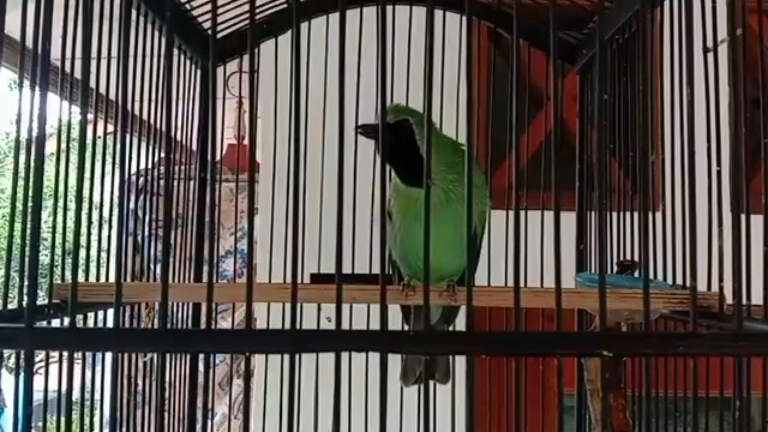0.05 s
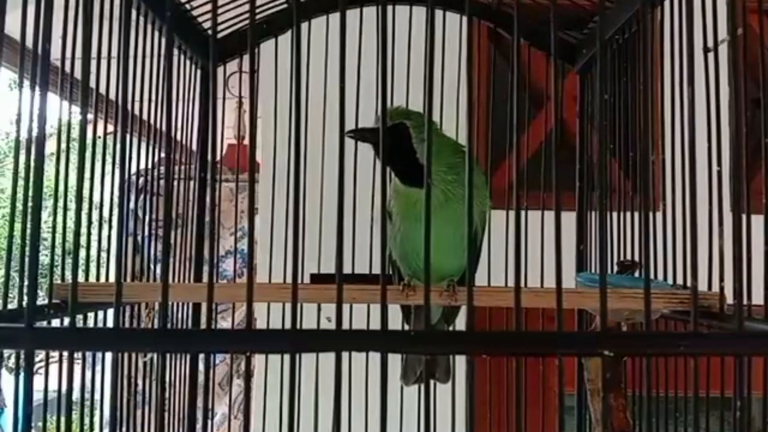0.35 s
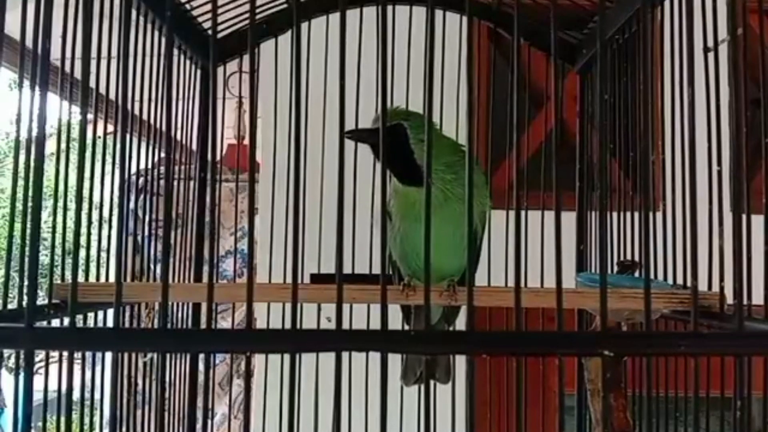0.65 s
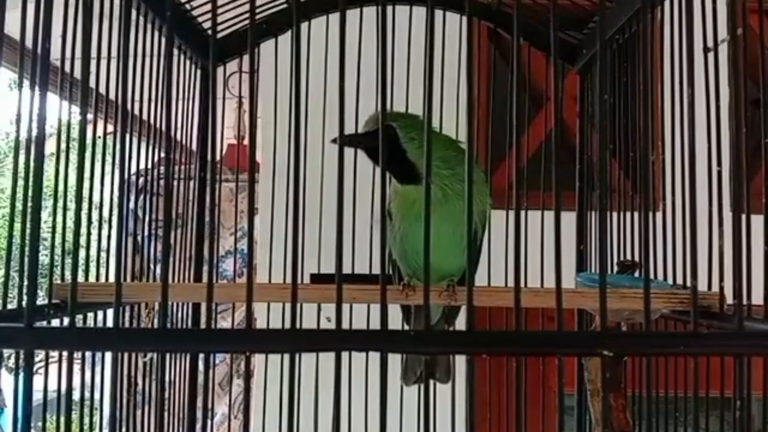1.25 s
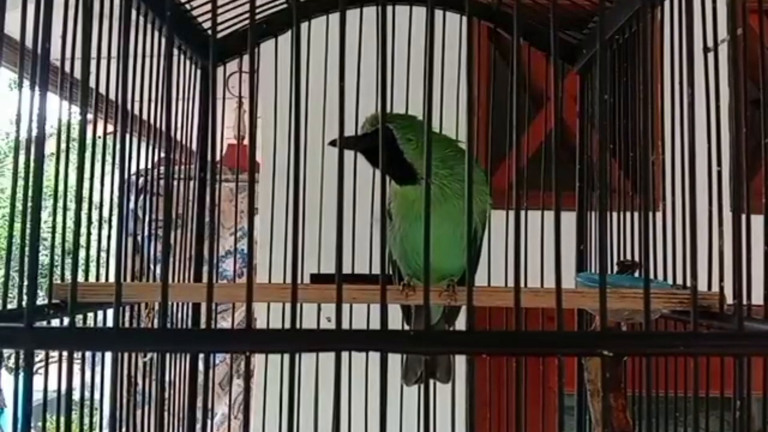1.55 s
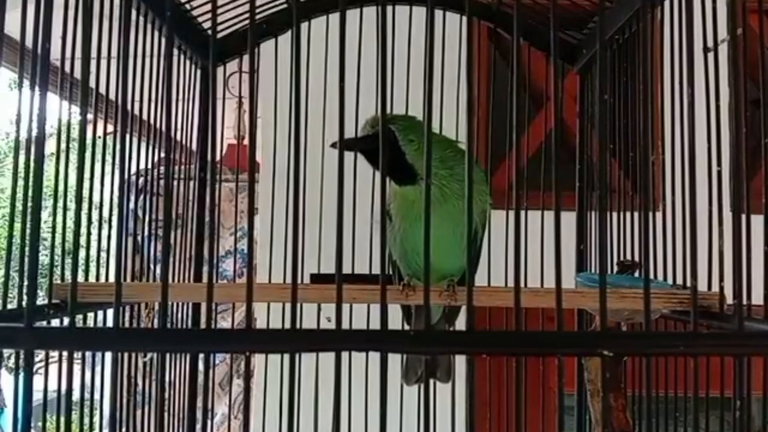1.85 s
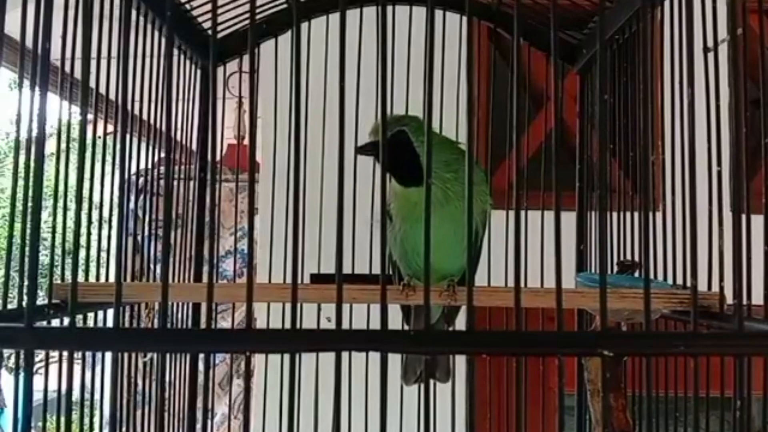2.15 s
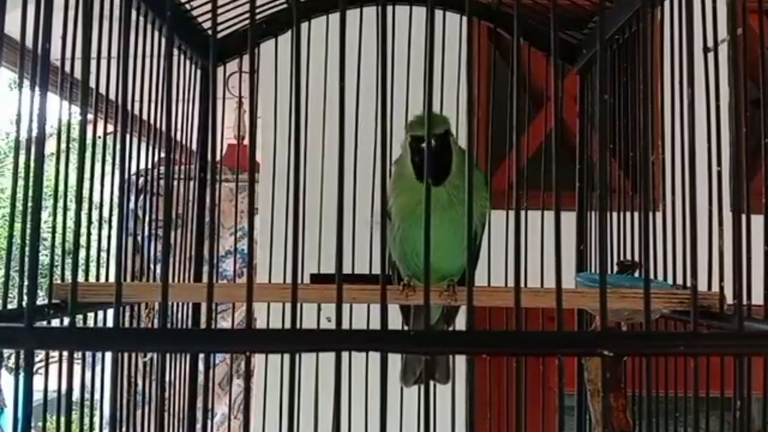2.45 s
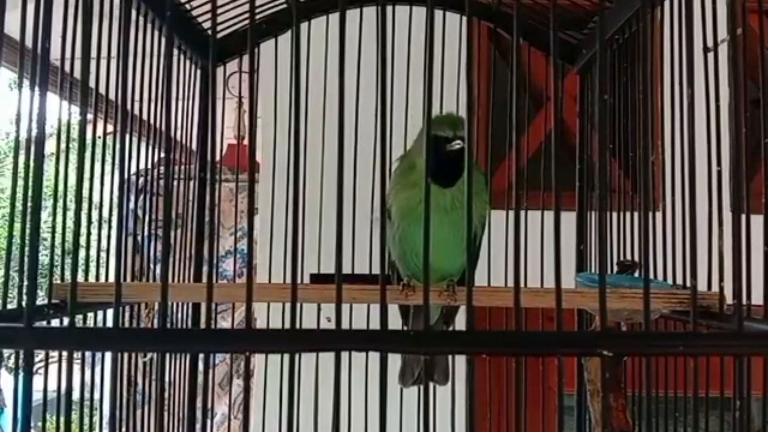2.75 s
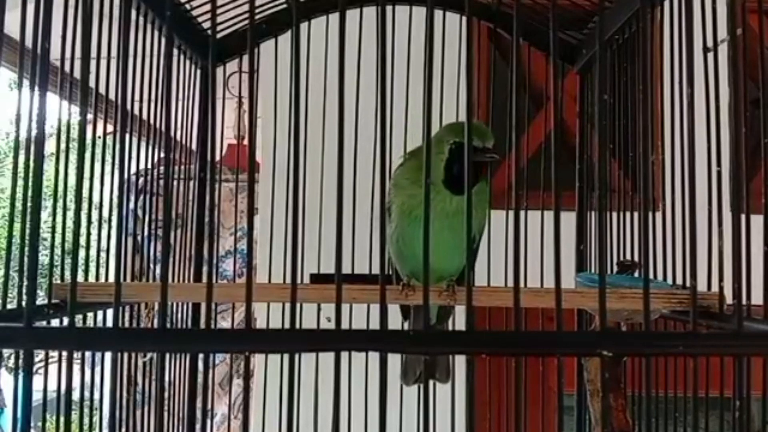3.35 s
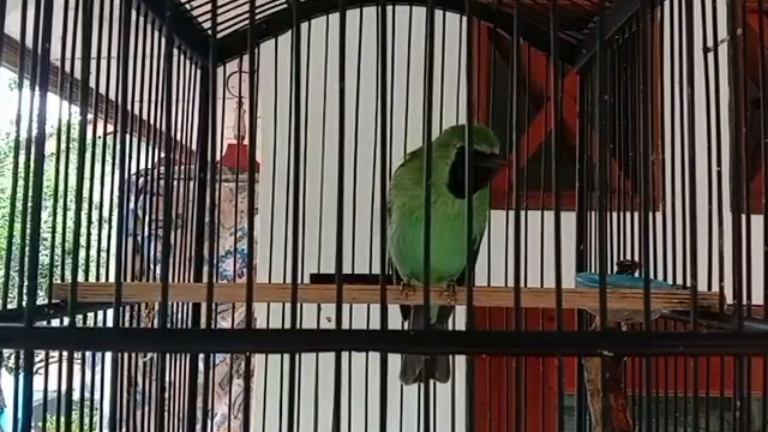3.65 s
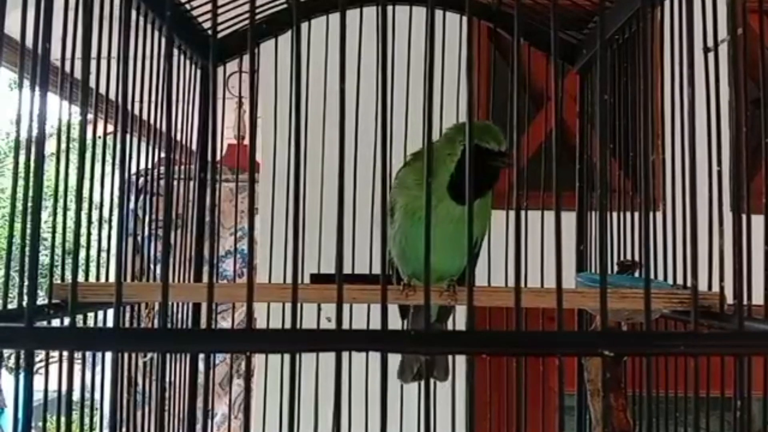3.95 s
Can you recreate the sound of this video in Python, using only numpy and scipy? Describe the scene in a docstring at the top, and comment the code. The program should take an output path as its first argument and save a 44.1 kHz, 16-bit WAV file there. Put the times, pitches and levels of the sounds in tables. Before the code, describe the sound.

Birds sing on an echoing porch: first a loud chirp right at the microphone, then a quieter, continuous run of sliding whistles and high chips from farther off, and finally another loud chirp. Faint outdoor hiss lies underneath.

```python
"""A caged songbird gives two loud, close whistles, one at the start and one at the end.
Between them, birds farther off trade rising and falling whistles, steep chips and thin ticks.
Each call is a nearly pure tone that slides in pitch, smeared by the hard walls of a porch.
A faint low rumble, a hiss and a distant drone lie underneath."""
import sys
import numpy as np
from scipy import signal
from scipy.fft import rfft, irfft
from scipy.io import wavfile
from scipy.ndimage import uniform_filter1d

SR = 44100
rng = np.random.default_rng(int(sys.argv[2]) if len(sys.argv) > 2 else 0)


def persist_wave(psi):
    """Save psi, clipped to +-1, as 16-bit WAV."""
    counts = np.round(np.clip(psi, -1, 1) * 32767).astype(np.int16)
    wavfile.write(sys.argv[1], SR, np.atleast_2d(counts).T)


N = 176400  # 4 seconds

# a voice equally loud at every pitch (pitch [Hz], gain [dB])
EVEN_VOICE = [(2000, 0), (8000, 0)]
# overtones of peeps, chips and ticks, from twice the pitch up (level [dB])
CHIP_OVERTONES = [-39.5]


def amp(db):
    """Turns decibels into a factor to multiply by."""
    return 10 ** (np.asarray(db) / 20)


def unit(x):
    """Scales a signal to an average power of 1."""
    return x / np.sqrt(np.mean(x ** 2) + 1e-20)


def read(points, hz):
    """Looks up a frequency in a table, blending between rows on a log scale."""
    f, value = np.transpose(points)
    return np.interp(np.log(hz + 1), np.log(f + 1), value)


def add(mix, start_s, sound):
    """Adds a sound to the mix at a given time."""
    part = mix[max(round(start_s * SR), 0):][:len(sound)]
    part += sound[:len(part)]


def colour(x, gain):
    """Turns each frequency f up or down by gain(f)."""
    return irfft(rfft(x, 2 * N) * gain(np.fft.rfftfreq(2 * N, 1 / SR)))[:N]


def waver(size, rate_hz=91.8):
    """The smooth, random unsteadiness of a voice."""
    return np.interp(np.arange(size) / SR * rate_hz, np.arange(200), rng.standard_normal(200))


def whistle(hz, overtones, jitter, lift_db=0, rasp=0.7, tremble_hz=376):
    """A nearly pure tone: jitter shakes its pitch, and rasp makes its weak overtones shudder."""
    noise = rng.standard_normal((len(overtones) + 1, len(hz)))
    tremble, *shudders = unit(signal.lfilter(*signal.butter(3, tremble_hz, fs=SR), noise))
    hz = hz * (1 + jitter * (waver(len(hz)) + tremble))
    phase = 2 * np.pi * np.cumsum(hz) / SR
    upper = sum(amp(db) * (1 + rasp * shudder) * np.sin(k * phase) * (k * hz < SR / 2)
                for k, (db, shudder) in enumerate(zip(overtones, shudders), 2))
    return np.sqrt(2) * (np.sin(phase) + amp(lift_db) * upper)


def slides(notes, voice, overtones, attack, release, hold, swell_db, jitter, flutter_db=2):
    """Notes that slide in pitch. Attack, release and end-pitch hold are shares of a note's length."""
    out = np.zeros(N)
    for start, length, from_hz, to_hz, bend, db in notes:
        progress = np.linspace(0, 1, round(length * SR))
        # a bend above 0 slides fast at first; below 0, slowly at first
        travel = np.cumsum(np.exp(-bend * progress) * (progress <= 1 - hold))
        hz = from_hz + (to_hz - from_hz) * travel / travel[-1]
        fade = np.clip(progress / attack, 0, 1) * np.clip((1 - progress) / release, 0, 1)
        level = db + read(voice, hz) + swell_db * (progress - .5) + flutter_db * waver(len(hz))
        add(out, start, np.sin(np.pi / 2 * fade) * amp(level) * whistle(hz, overtones, jitter))
    return out


def porch(x, direct_db, walls_db, cages_db, cages_s, tail_db, patchy_db=4):
    """Direct sound, single wall echoes, scatter from nearby cages and a tail that rings unevenly."""
    # single echoes off the walls (rough delay [s], relative level [dB])
    wall_echoes = [(.0055, 1), (.0105, -2.5), (.017, 2), (.024, -5.5), (.035, -1), (.052, 0.5), (.078, 0.5)]
    # how long the porch rings (frequency [Hz], time to fade by 60 dB [s])
    ring_times = [(1500, 0.45), (2300, 0.47), (3300, 0.88), (4700, 0.62), (7000, 0.34), (13000, 0.35)]
    t = np.arange(SR) / SR
    walls = np.zeros(SR)
    for delay, db in wall_echoes:
        walls[round(delay * rng.uniform(.85, 1.15) * SR)] = amp(db)
    scatter = rng.standard_normal(SR) * (rng.random(SR) < 900 / SR)  # about 900 echoes a second
    cages = scatter * (t > .002) * np.exp(-t / cages_s)
    hz, times, spectrum = signal.stft(rng.standard_normal(SR), SR, nperseg=256)
    patches = unit(uniform_filter1d(rng.standard_normal(spectrum.shape), size=24, axis=1))
    decay = amp(patchy_db * patches - 60 * times / read(ring_times, hz)[:, None])
    tail = signal.istft(spectrum * decay, SR, nperseg=256)[1][:SR] * np.minimum(t / .02, 1)
    echo = sum(amp(db) * part / np.linalg.norm(part)
               for db, part in [(walls_db, walls), (cages_db, cages), (tail_db, tail)])
    return amp(direct_db) * x + signal.fftconvolve(x, echo)[:N]


def close_bird():
    """Two loud whistles right at the microphone: the first turns raspy as it drops, the last swells."""
    # first whistle (time [s], pitch [Hz], level [dB], overtone lift [dB])
    dropping = [(0, 2345, -28, -3), (.002, 2340, -13, -3), (.012, 2260, -13.5, -3), (.02, 2300, -10, -2),
                (.03, 2400, -10.5, 1), (.044, 2260, -14, 2), (.058, 2020, -20, 9), (.066, 1930, -30, 16),
                (.076, 1860, -33, 16), (.088, 1400, -62, 10)]
    # last whistle (same columns)
    swelling = [(3.955, 2450, -44, 6), (3.973, 2470, -36, -8), (3.983, 2488, -21.5, -10),
                (3.99, 2502, -19.5, -11), (3.996, 2552, -15, -19), (4.0, 2613, -16, 3)]
    # softer tone under it, from the other side of the bird's voice box (same columns)
    undertone = [(3.96, 1470, -66, -4), (3.975, 1820, -48, 13), (3.984, 2010, -39.5, 9),
                 (4.0, 2070, -57, 9)]
    # overtones, from twice the pitch up (level before the lift [dB])
    overtones = [-25.5, -37, -41, -61.5, -50.5]
    # how throat and beak shape the sound (frequency [Hz], gain [dB])
    beak = [(2600, 0), (3900, 2.5), (4800, -6), (5450, -16), (6000, -1.5), (6400, -7), (7000, -0.5),
            (9800, 5), (10700, -5), (11800, 4.5), (14500, 1.5)]
    out = np.zeros(N)
    for note in (dropping, swelling, undertone):
        times, *curves = np.transpose(note)
        t = np.arange(times[0], times[-1], 1 / SR)
        hz, db, lift = (np.interp(t, times, curve) for curve in curves)
        add(out, times[0], amp(db) * whistle(hz, overtones, jitter=.0066, lift_db=lift, rasp=.86))
    voice = colour(out, lambda f: amp(read(beak, f)))
    return porch(voice, direct_db=-1, walls_db=-20, cages_db=-16, cages_s=.018, tail_db=-15, patchy_db=2)


def outdoor_air(level_db=-64.5):
    """Steady noise, heard as a low rumble and a faint hiss."""
    # tone of the noise (frequency [Hz], relative level [dB])
    tone = [(20, -8.5), (45, -18), (65, -1), (88, 7), (115, -3), (160, -12.5), (210, -12), (320, -15),
            (600, -17), (1050, -22), (1280, -17), (1600, -26.5), (4000, -17.5), (7000, -32), (9000, -37),
            (11500, -38.5), (15000, -48.5)]
    return amp(level_db) * unit(colour(rng.standard_normal(N), lambda f: amp(read(tone, f))))


def distant_drone():
    """Noise ringing at two low pitches makes a faint drone that slowly swells."""
    # loudness of the drone (time [s], level [dB])
    swell = [(0, -95), (1.302, -73.5), (1.651, -73.5), (2.099, -79), (2.8, -65.5), (3.148, -66.5),
             (3.319, -60.5), (3.55, -70), (4, -72)]
    # where it rings (frequency [Hz], width [Hz], relative level [dB])
    bands = [(206, 84, -7), (262.2, 4, 4.5)]
    drone = colour(rng.standard_normal(N),
                   lambda f: sum(amp(db) / (1 + (2 * (f - hz) / width) ** 2) for hz, width, db in bands))
    return amp(np.interp(np.arange(N) / SR, *np.transpose(swell))) * unit(drone)


def peeps_and_chips():
    """Thin, high peeps, joined later by rough chips that drop steeply in pitch."""
    # peeps (start [s], length [s], from [Hz], to [Hz], bend, level [dB])
    peep_notes = [(.175, 0.068, 7400, 6500, 0, -64), (.425, 0.022, 5950, 6020, 0.2, -57.5),
                  (.88, 0.029, 4330, 4270, 0.14, -49.5), (2.7, 0.06, 6900, 6760, 0.66, -46),
                  (2.93, 0.019, 7430, 7160, 0.14, -43.5), (3.745, 0.052, 7530, 6320, 0.41, -57)]
    # chips (same columns)
    chip_notes = [(1.398, 0.017, 5490, 4200, 0.57, -48.5), (1.495, 0.076, 7560, 4130, 0.95, -42),
                  (1.632, 0.064, 7600, 4330, 0.24, -41.5), (1.772, 0.062, 7450, 4240, -0.88, -38.5),
                  (1.918, 0.057, 7220, 4500, -0.77, -40), (2.19, 0.064, 7500, 4530, 0.13, -44.5),
                  (2.43, 0.057, 7490, 4660, 0.83, -42), (2.555, 0.053, 7570, 4760, -0.23, -43),
                  (2.685, 0.14, 7260, 4270, -1.04, -37.5), (2.928, 0.11, 7450, 4850, -0.19, -37.5)]
    # loudness along a chip's slide (pitch [Hz], gain [dB])
    chip_voice = [(4300, -14.5), (5000, 3), (6000, -13), (6800, -15.5), (7800, -4)]
    peeps = slides(peep_notes, EVEN_VOICE, CHIP_OVERTONES,
                   attack=.66, release=.46, hold=0, swell_db=5, jitter=.0071)
    chips = slides(chip_notes, chip_voice, CHIP_OVERTONES,
                   attack=.25, release=.12, hold=0, swell_db=3, jitter=.017)
    return porch(peeps + chips, direct_db=-15, walls_db=-12, cages_db=-8, cages_s=.014, tail_db=-6)


def rising_whistles():
    """Clean upward whistles from farther off, heard mostly as echoes."""
    # whistles (start [s], length [s], from [Hz], to [Hz], bend, level [dB])
    notes = [(.21, 0.15, 3010, 3202, 1.5, -50), (.44, 0.19, 3220, 4884, 0.94, -46),
             (.545, 0.19, 2450, 3230, 3, -51), (.715, 0.2, 3090, 5205, 2.05, -47.5),
             (.93, 0.22, 2420, 4490, 1.58, -43), (1.225, 0.21, 2543, 4314, 2.5, -41),
             (1.53, 0.19, 2617, 4370, 1.93, -42), (3.135, 0.12, 3880, 5950, 0.67, -45.5),
             (3.34, .235, 3427, 4970, 1.76, -42), (3.63, 0.2, 3340, 4997, 2.3, -43),
             (3.85, .14, 3470, 5305, 0.54, -41), (3.85, .12, 2190, 3074, 0.76, -42)]
    # overtones, from twice the pitch up (level [dB])
    overtones = [-42.5, -51.5]
    song = slides(notes, EVEN_VOICE, overtones,
                  attack=.19, release=.19, hold=.12, swell_db=2.5, jitter=.0032)
    return porch(song, direct_db=-12, walls_db=-7, cages_db=-6, cages_s=.04, tail_db=-5)


def falling_whistles():
    """Downward whistles from farther off, made rough by a shaky pitch and heard mostly as echoes."""
    # whistles (start [s], length [s], from [Hz], to [Hz], bend, level [dB])
    notes = [(.24, 0.15, 5770, 2726, -1.5, -43.5), (1.295, 0.23, 5884, 2454, 3, -47),
             (1.635, 0.16, 5173, 2557, 2.8, -45.5), (1.815, 0.23, 5265, 2347, 2.12, -41.5),
             (2.05, 0.23, 7184, 2270, 3, -37), (2.312, 0.23, 7440, 2122, 2.8, -37.5),
             (2.59, 0.25, 6900, 2136, 2.5, -39), (2.595, .13, 3924, 2526, 1.3, -46),
             (2.885, .22, 6270, 2216, 2.1, -38), (3.17, 0.21, 7260, 2227, 2.43, -38),
             (3.455, .22, 7256, 2220, 2.08, -38)]
    # loudness along the slide (pitch [Hz], gain [dB])
    voice = [(2100, -11), (2600, -3.5), (3300, 1.5), (4100, 1.5), (5000, -3.5), (6000, -16.5), (7400, -8.5)]
    # overtones, from twice the pitch up (level [dB])
    overtones = [-44, -41]
    song = slides(notes, voice, overtones, attack=.12, release=.22, hold=.07, swell_db=0, jitter=.012)
    return porch(song, direct_db=-14, walls_db=-7, cages_db=-5, cages_s=.038, tail_db=-4)


def thin_ticks(length_s=.008, from_hz=7200, to_hz=4740):
    """A run of downward slides, so short that they sound like ticks, leads into the chips."""
    # ticks (start [s], level [dB])
    ticks = [(.53, -60), (.657, -63), (0.786, -61), (.852, -53.5), (.917, -58.5), (.98, -57.5),
             (1.042, -56), (1.105, -57), (1.17, -58.5), (1.237, -58), (1.302, -55), (1.378, -58)]
    notes = [(start, length_s, from_hz, to_hz, 0, db) for start, db in ticks]
    run = slides(notes, EVEN_VOICE, CHIP_OVERTONES,
                 attack=.4, release=.36, hold=0, swell_db=15, jitter=.013)
    return porch(run, direct_db=-10.5, walls_db=-18, cages_db=-12, cages_s=.006, tail_db=-8.5)


def scene():
    """All the birds over the quiet background, in one channel."""
    return (close_bird() + outdoor_air() + distant_drone()
            + peeps_and_chips() + rising_whistles() + falling_whistles() + thin_ticks())[None]


def record(dry, top_hz=15100):
    """The microphone colours the sound, and the highest treble is cut off."""
    # tone of the microphone (frequency [Hz], gain [dB])
    microphone = [(20, 0.5), (7400, 1), (8100, -17), (9400, -14.5), (10100, 2), (12000, 2.5), (15000, -5)]
    heard = colour(dry[0], lambda f: amp(read(microphone, f)))
    treble_cut = signal.firwin(511, top_hz, window=("kaiser", 9), fs=SR)
    return signal.oaconvolve(heard, treble_cut, "same")[None]


dry = scene()
out = record(dry)
persist_wave(out)
```